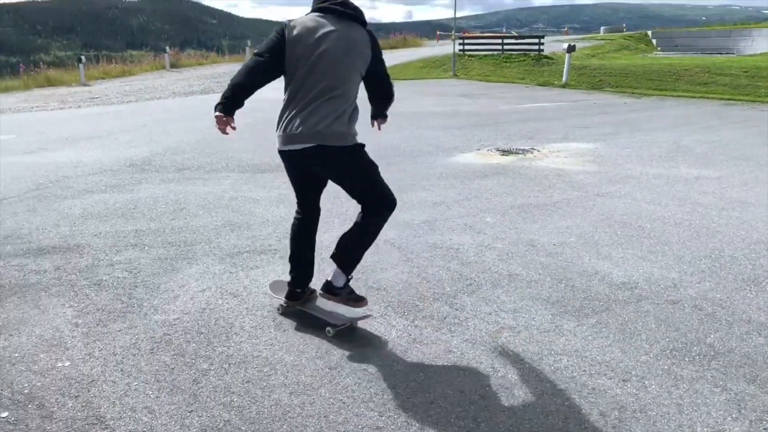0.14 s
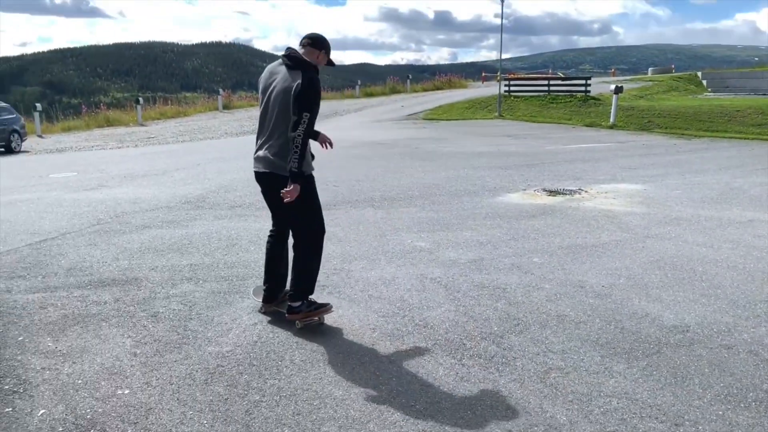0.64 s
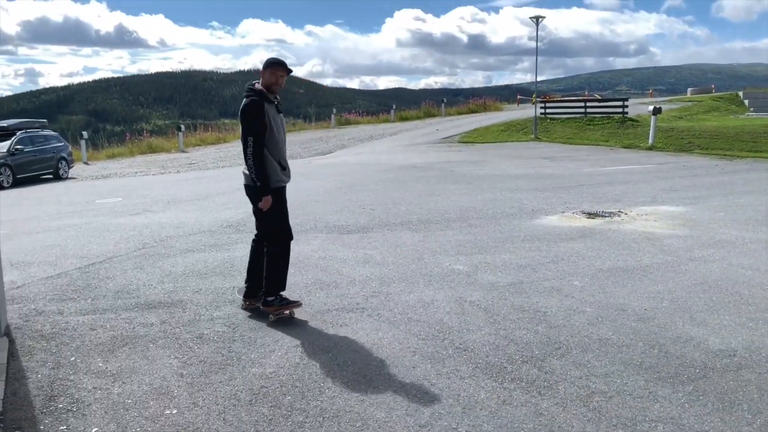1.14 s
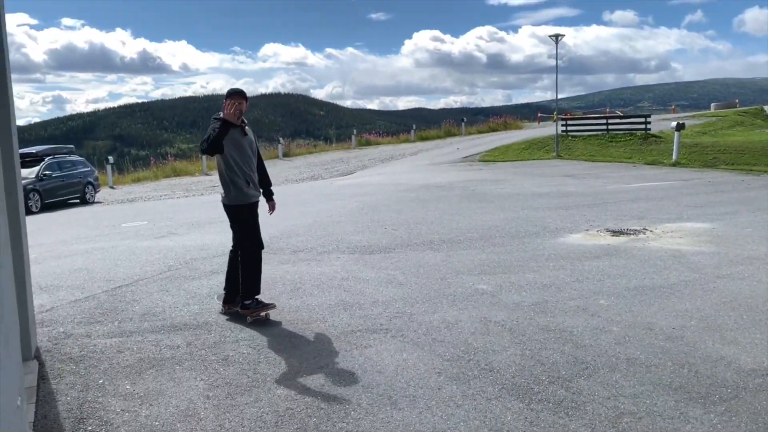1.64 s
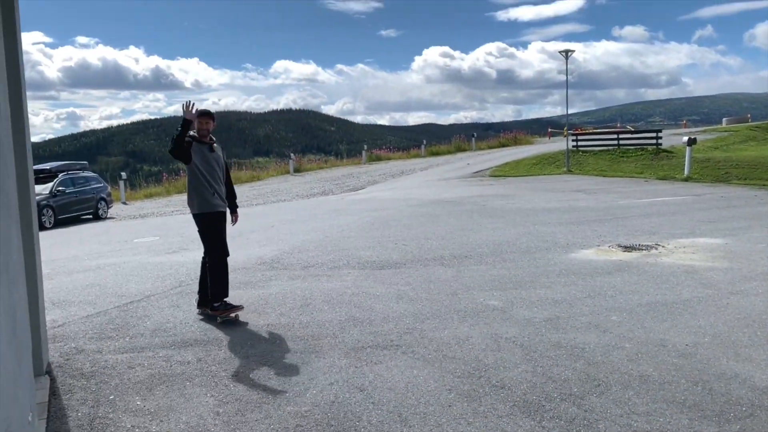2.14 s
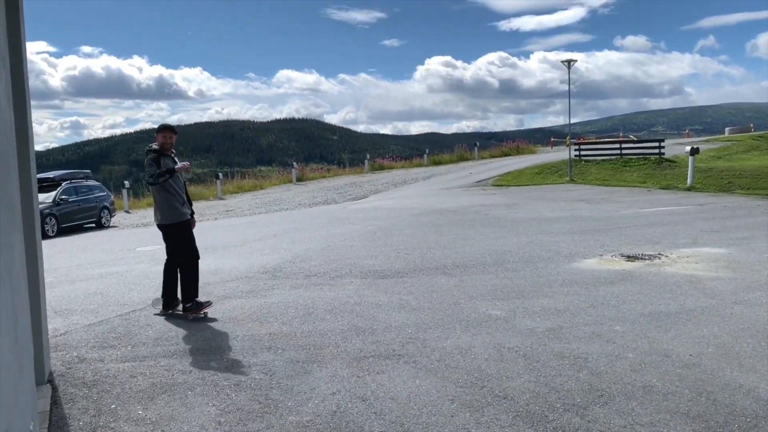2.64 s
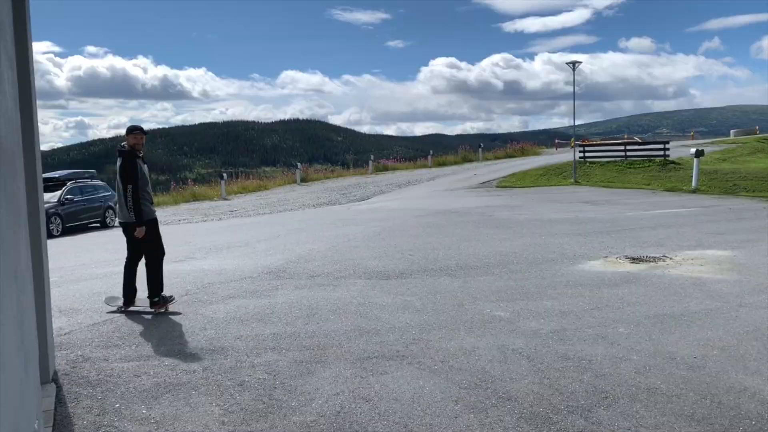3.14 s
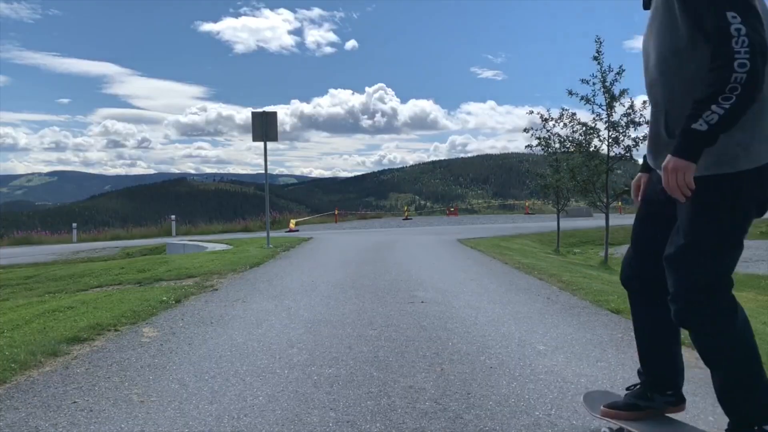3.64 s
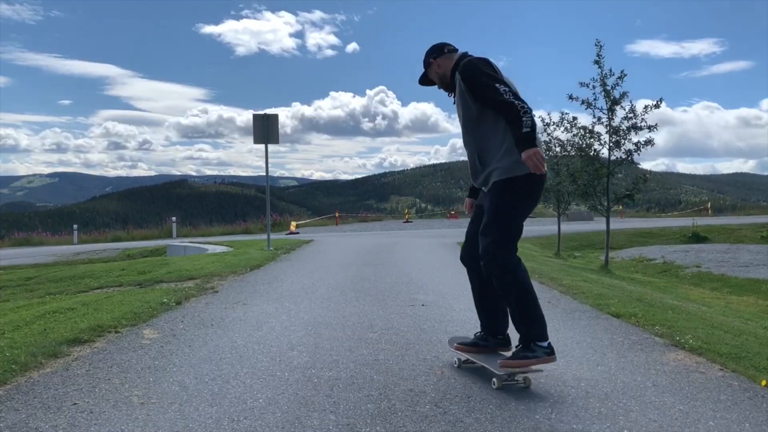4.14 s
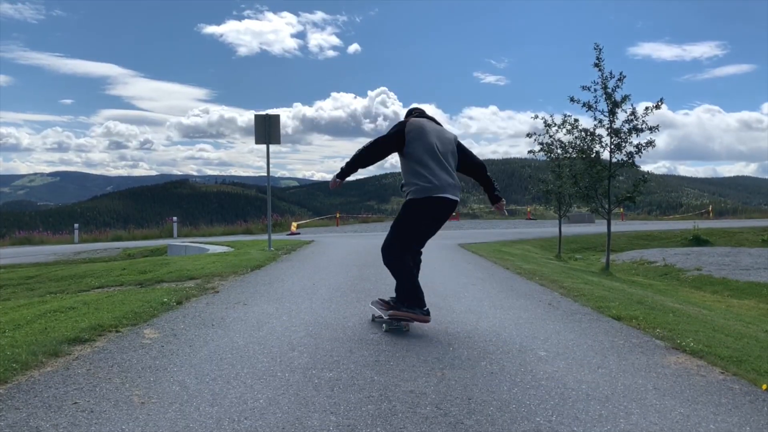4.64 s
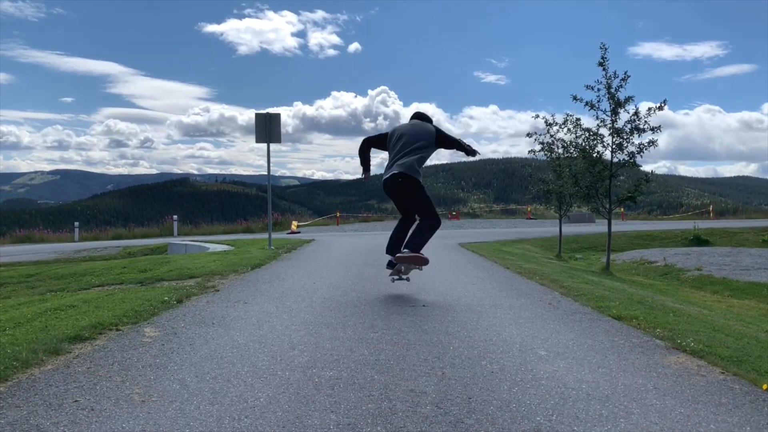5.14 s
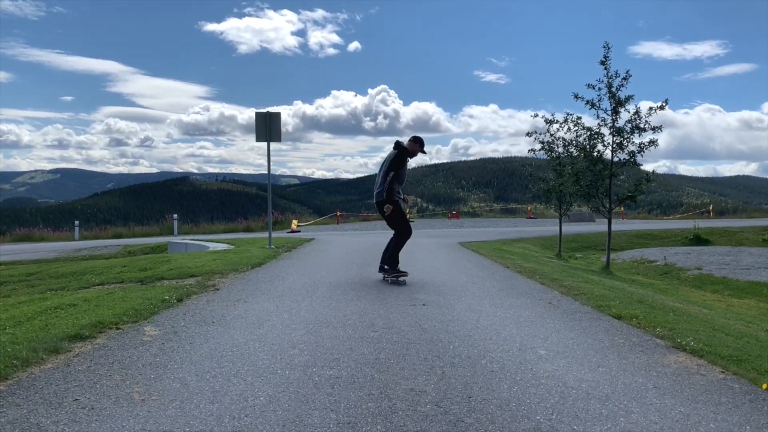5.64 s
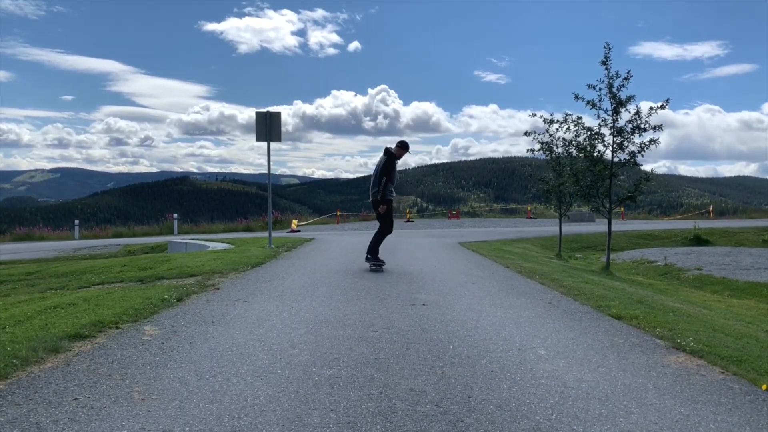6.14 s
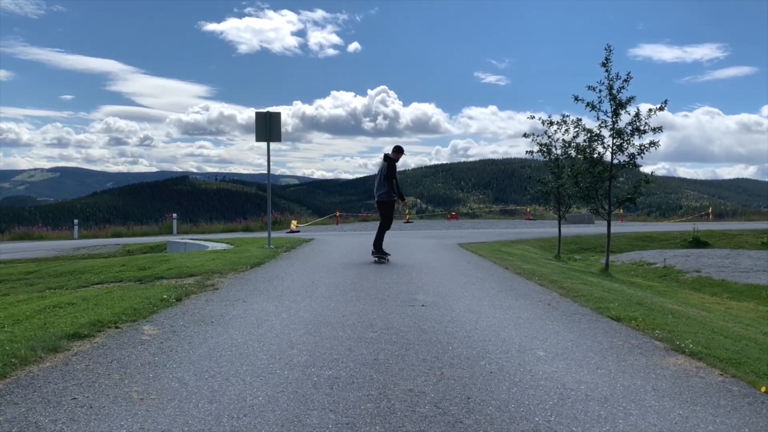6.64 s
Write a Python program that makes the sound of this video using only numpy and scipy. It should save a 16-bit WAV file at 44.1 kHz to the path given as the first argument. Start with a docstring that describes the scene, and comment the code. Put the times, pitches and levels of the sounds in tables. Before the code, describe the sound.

Two close microphones catch a skateboard on rough asphalt. First a clustered landing clack, gritty shoe scuffs and a deck rumble that slowly fades in light wind. Then suddenly a windy road: a sharp knock, brighter truck rattle passing from right to ahead, a crisp pop, a brief lull, a heavy double landing, then receding wheels beneath strong wind buffets.

```python
"""A yard, then a windy road, joined by a hard cut: a skateboard on coarse asphalt, heard by two close microphones.
In the yard it lands a flip close by and rumbles slowly away; on the road it rolls past, pops, lands and rolls off.
Wheels and grit are filtered noise under uneven loads; blows shake resonances of the plywood deck and metal trucks.
Shoes scuff grit, rubber squeaks as short unsteady tones, and wind is low noise with buffets, flutter and puffs."""
import sys
import numpy as np
from scipy import signal
from scipy.fft import rfft, irfft, next_fast_len
from scipy.io import wavfile
from scipy.ndimage import uniform_filter1d, map_coordinates

SR = 44100
rng = np.random.default_rng(int(sys.argv[2]) if len(sys.argv) > 2 else 0)


def master(y):
    """Save y as 16-bit WAV."""
    cut = np.clip(np.atleast_2d(y).T, -1, 1)
    pcm = np.round(cut * 32767)  # scale
    wavfile.write(sys.argv[1], SR, pcm.astype(np.int16))


def elevation(decibels):
    """Turn decibel levels (scalar or array-like) into linear amplitude ratios."""
    levels = np.asarray(decibels, float)
    return 10 ** (levels / 20)


N = 298116
TIME = np.arange(N) / SR
CUT_S = 3.486  # the yard ends and the road begins
# Levels in the tables are relative: each layer sets its own gain when it is mixed.


def unit(x):
    """Scaled to rms 1."""
    return x / np.sqrt(np.mean(x ** 2) + 1e-20)


def along(points, hz):
    """Interpolates (hz, value) points on a log frequency axis."""
    f, v = np.transpose(points)
    return np.interp(np.log(hz + 1), np.log(f + 1), v)


def gains(rows):
    """One gain per sample for each dB column after the time."""
    s, *columns = np.transpose(rows)
    return [elevation(np.interp(TIME, s, c)) for c in columns]


def wobble(rate):
    """A smooth random curve, rate knots a second."""
    knots = rng.standard_normal(int(N * rate / SR) + 4)
    return map_coordinates(knots, [TIME * rate])


def filtered(x, response):
    """x times a complex response of frequency."""
    m = next_fast_len(N + 8192)
    return irfft(rfft(x, m) * response(np.fft.rfftfreq(m, 1 / SR)), m)[..., :N]


def colour(spectrum):
    """Response of a (hz, level_db) spectrum."""
    return lambda hz: elevation(along(spectrum, hz))


def ring(modes):
    """Causal response of (centre_hz, width_hz, level_db) resonances, added with alternating signs."""
    def response(f):
        return sum((-1) ** k * elevation(db) * 1j * f * width / (centre * centre - f * f + 1j * f * width)
                   for k, (centre, width, db) in enumerate(modes))
    return response


def steady(x, span):
    """Evens out the chance swells of a narrow noise over span seconds, so that the load alone sets its level."""
    power = np.abs(uniform_filter1d(x ** 2, int(span * SR), axis=-1))
    return unit(x / np.sqrt(power + 0.11 * np.mean(x ** 2)))


def patches(x, patchy_db):
    """Random gain in patches some hundred hertz wide and some tens of milliseconds long."""
    z = signal.stft(x, nperseg=128)[2]
    field = uniform_filter1d(rng.standard_normal(z.shape[1:]), size=30, axis=1)
    return unit(signal.istft(z * elevation(patchy_db * unit(field)), nperseg=128)[1][:, :N])


def swells(rows):
    """Bell-shaped envelopes from (centre_s, level_db, length_s)."""
    return sum(elevation(db) * np.exp(-((TIME - s) / length) ** 2) for s, db, length in rows)


def bursts(rows, rise, edge):
    """Envelopes (start_s, level_db, length_s): a quick rise, then an end more sudden the larger edge is."""
    env = np.zeros(N + SR)
    t = np.arange(SR // 5) / SR
    for s, db, length in rows:
        fall = np.exp(-(t / max(length, .001)) ** edge)
        env[round(s * SR):][:len(t)] += elevation(db) * (1 - np.exp(-t / rise)) * fall
    return env[:N]


def touches(times, db):
    """One impulse at each time."""
    samples = np.round(np.multiply(times, SR)).astype(int)
    return np.bincount(samples, elevation(db + np.zeros(len(times))), N)


def ring_peak(modes):
    """Largest swing of the modes after one unit impulse."""
    return np.abs(filtered(touches([.01], 0), ring(modes))).max()


def stones(rough_db, rate):
    """Two unrelated noises under one uneven load: wheels bumping over asphalt stones."""
    return rng.standard_normal((2, N)) * elevation(rough_db * wobble(rate))


# how much of the strong wind both ports share: hz, share (0-1)
AIR_SHARE = [(60, 0.67), (130, 0.02), (200, 0.38), (290, 0.6), (400, 0.86), (640, 0.13)]


def eddies(spectrum):
    """Air motion at the two ports: largely shared in the yard's light wind, shared by frequency on the road."""
    air = filtered(rng.standard_normal((3, N)), colour(spectrum))
    share = lambda hz: np.clip(along(AIR_SHARE, hz), 0, 1)
    strong = filtered(air, lambda hz: np.sqrt([share(hz), 1 - share(hz), 1 - share(hz)]))
    calm = 0.89  # share at every frequency
    light = np.sqrt(calm) * air[0] + np.sqrt(1 - calm) * air[1:]
    return np.where(TIME < CUT_S, light, strong[0] + strong[1:])


# strength of the wind on the ports: time_s, level_db
WIND_STRENGTH = [(0, -49), (1, -47.5), (1.7, -46), (2.15, -37.5), (2.45, -41.5), (2.9, -52.5),
                 (3.48, -47.5), (3.49, -27.5), (3.9, -25), (4.15, -24), (4.4, -19.5), (4.7, -22), (5, -22),
                 (5.5, -21), (5.8, -25.5), (6.04, -21), (6.08, -31), (6.12, -21), (6.2, -21.5), (6.55, -22),
                 (6.76, -19)]
# deep soft thumps, of the board and shoes in the yard and of wind buffets on the road: centre_s, level_db, length_s
SOFT_THUMPS = [(.13, -37.5, 0.063), (.34, -38.5, 0.028), (.52, -36, 0.019), (1.39, -55, 0.026),
               (1.8, -57, 0.043), (2.3, -27, 0.048), (2.58, -40.5, 0.054), (2.73, -43, 0.017),
               (3.4, -41, 0.017), (3.495, -20, 0.012), (3.8, -21, 0.0057), (4.2, -28, 0.013),
               (4.34, -17, 0.0089), (4.61, -40, 0.016), (4.72, -18, 0.03), (4.93, -25, 0.037),
               (5.26, -21.5, 0.037), (5.41, -12, 0.0051), (5.7, -18, 0.01), (6.01, -7, 0.019),
               (6.37, -12, 0.0084), (6.48, -12, 0.02), (6.71, -39, 0.0076)]
# short low swells, of wind flutter, and at 5.317 s the low ring of the deck landing: centre_s, level_db, length_s
LOW_SWELLS = [(3.525, -24.5, 0.025), (3.607, -23, 0.011), (3.77, -20, 0.012), (3.94, -26.5, 0.062),
              (4.2, -25, 0.045), (4.34, -22.5, 0.029), (4.555, -25, 0.047), (4.7, -28, 0.048),
              (4.85, -18, 0.013), (4.97, -24, 0.082), (5.317, -1, 0.0046), (5.35, -26, 0.03),
              (5.46, -40, 0.028), (6.03, -24, 0.015), (6.31, -13.5, 0.017), (6.46, -10, 0.01),
              (6.67, -20, 0.0081), (6.73, -17, 0.0067)]
# the strongest sharp puffs: start_s, level_db, left_over_right_db
STRONG_PUFFS = [(3.764, -13.5, 3), (3.835, -21, 3), (3.887, -26, -3), (3.93, -16, 0), (4.182, -20, -2),
                (4.244, -14, 6), (4.315, -12.5, 2), (4.577, -12, 4.5), (4.625, -15, 2), (4.843, -15.5, -4),
                (4.994, -16.5, 9), (5.063, -10.5, 5), (5.118, -13, 5.5), (5.186, -20, 9), (5.25, -10, 5),
                (5.99, -19.5, 1), (6.017, -15.5, 2), (6.156, -14.5, 4.5), (6.238, -14.5, -1.5),
                (6.3, -26, 6), (6.366, -21, 5), (6.451, -12, -2.5), (6.654, -18.5, 5), (6.72, -22.5, 13)]
# spectra of slow buffets, faster flutter, the body of a puff, the edge of a breaking eddy: hz, level_db (per Hz)
BUFFET_SPECTRUM = [(15, -32.5), (35, -10), (62, 9), (100, 1), (160, -7), (300, -33), (1500, -120)]
FLUTTER_SPECTRUM = [(80, -18), (150, 5.5), (280, 1.5), (450, -8), (680, -17), (850, -28), (1300, -39.5),
                    (2500, -66.5), (5000, -120)]
PUFF_SPECTRUM = [(40, 3), (120, -3.5), (300, 0), (600, -11.5), (1100, -28), (1600, -71), (2500, -48),
                 (5000, -120)]
SNAP_SPECTRUM = [(150, -40), (450, -3), (900, 0), (1400, -8), (1900, -30), (3000, -120)]
# sudden front of a strong puff: centre_hz, width_hz, level_db
PUSH_MODE = [(416, 240, 0)]


def sharp_puffs(strength_db):
    """Sharp puffs on each port, listed strong ones and chance small ones, with bright edges and sudden fronts."""
    count = 50  # small puffs, at chance times
    when = rng.uniform(0, TIME[-1], count)
    size, lean = rng.standard_normal((count, 2)).T
    small_db = np.interp(when, TIME, strength_db) + 5 - 3 * size
    small = np.transpose([when, small_db, 2.9 * lean])
    s, db, pan_db = np.vstack([STRONG_PUFFS, small]).T
    length = np.full(len(s), .008)
    sides_db = [db + side * pan_db / 2 for side in (1, -1)]  # left, right
    env = np.array([bursts(zip(s, side_db, length), rise=0.0011, edge=2.2) for side_db in sides_db])
    body = env * steady(eddies(PUFF_SPECTRUM), 0.0125)
    # the strongest eddies break with a brief bright edge
    snaps = env ** 2 / env.max() * steady(eddies(SNAP_SPECTRUM), 0.015)
    strong = len(STRONG_PUFFS)
    fronts = np.array([touches(s[:strong], side_db[:strong]) for side_db in sides_db])
    push = filtered(fronts, ring(PUSH_MODE)) / ring_peak(PUSH_MODE)
    return body + elevation(-10.0) * snaps + elevation(-11) * push


def wind():
    """Eddies press on each port as slow buffets, flutter in lumps and sharp puffs; soft low thumps share the noise."""
    strength_db = np.interp(TIME, *np.transpose(WIND_STRENGTH))
    buffet = elevation(strength_db + 2.43 * wobble(12)) + swells(SOFT_THUMPS)
    # flutter swings wider than the strength
    flutter = elevation(12 + 1.448 * strength_db + 0.37 * wobble(4.5)) + swells(LOW_SWELLS)
    slow = steady(eddies(BUFFET_SPECTRUM), 0.065)
    lumps = elevation(2.2 * wobble(35) + 0.77 * np.array([wobble(60), wobble(60)]))
    fast = unit(lumps * steady(eddies(FLUTTER_SPECTRUM), 0.024))
    return elevation(4.0) * buffet * slow + elevation(-1.0) * flutter * fast + elevation(2.5) * sharp_puffs(strength_db)


# shoe scuffs and grit ticks: start_s, level_db, treble_over_level_db, length_s
SHOE_SCUFFS = [(0.31, -33, -0.5, 0.069), (0.399, -31, -6, 0.0098), (0.469, -34.5, -8, 0.087),
               (2.163, -41.5, 0, 0.17), (2.26, -39, 6, 0.0055), (2.429, -25, 0.5, 0.0045),
               (2.442, -39, -3.5, 0.084), (2.535, -40.5, -2, 0.052), (2.603, -45.5, -2, 0.044),
               (2.795, -42, 4, 0.0044), (2.844, -37, -14, 0.03), (2.877, -35.5, -20, 0.04),
               (2.965, -38.5, -7, 0.017), (3.212, -56.5, 5, 0.01), (3.467, -37, -28, 0.006),
               (4.138, -36, 5, 0.011), (4.163, -29.5, -3, 0.02), (5.456, -30.5, -21, 0.019)]
# ring of one small bright tick: centre_hz, width_hz, level_db
TICK_MODE = [(4900, 170, 0)]
# spectra of the hiss and of the finer grit, also used for wheels and blows: hz, level_db (per Hz)
HISS_SPECTRUM = [(300, -49), (500, -10.5), (1000, 8.5), (2000, 8.5), (4000, 2), (6500, -2.5), (8000, -38.5),
                 (12000, -85)]
GRIT_SPECTRUM = [(1500, -79.5), (3500, 6.5), (5000, -9.5), (6500, 2.5), (8500, 5.5), (10500, 6), (13000, 7),
                 (15500, 7), (17000, -11.5)]
# modes of the plywood deck (low) and the metal trucks (high), for every board sound: centre_hz, width_hz, level_db
DECK_MODES = [(200, 140, 0), (304, 98, 3), (494, 270, -8), (702, 147, 2), (1052, 167, 3)]
TRUCK_MODES = [(1370, 160, -10.5), (1618, 150, 7), (2316, 130, -21), (3040, 130, -4), (3300, 240, -4),
               (3730, 180, -6)]


def scuffs():
    """Soles drag grit across the grip tape and the ground in squeaky streaks, shaking deck and trucks a little."""
    s, db, treble_db, length = np.transpose(SHOE_SCUFFS)
    drag = patches(stones(rough_db=3.0, rate=250), patchy_db=2.5)

    def scrape_response(hz):
        trucks = elevation(-15.0) * ring(TRUCK_MODES[2:])(hz)
        deck = elevation(15.0) * ring(DECK_MODES[3:])(hz)
        return elevation(along(HISS_SPECTRUM, hz)) + trucks + deck

    scrape = unit(filtered(drag, scrape_response))
    dust = unit(filtered(drag, colour(GRIT_SPECTRUM)))
    scrape = scrape * bursts(zip(s, db, length), rise=0.0087, edge=2.4)
    dust = dust * bursts(zip(s, db + treble_db, length), rise=0.0016, edge=3.0)
    tick = filtered(touches([1.097], 0), ring(TICK_MODE))
    return elevation(-28) * tick / tick.max() + scrape + dust


# short squeaks of rubber: centre_s, level_db, pitch_hz (mean), length_s
RUBBER_SQUEAKS = [(.33, -30, 4800, .014), (0.344, -36.5, 2820, 0.018), (0.341, -33, 5150, 0.014),
                  (0.37, -41, 2050, 0.026), (0.377, -33, 4830, .006), (0.481, -33, 3970, 0.011),
                  (0.493, -40, 3850, 0.012), (0.494, -42, 2420, 0.015), (0.53, -43, 2490, .012),
                  (3.543, -36, 5730, 0.013), (3.558, -33, 1880, .014), (3.687, -27.5, 6400, 0.0058)]


def squeaks():
    """Rubber sticks and slips for a moment: an unsteady tone under a bell-shaped swell."""
    waver = 1 + .05 * wobble(300)  # factor on the pitch
    rough = elevation(5.9 * wobble(400))
    warped_s = np.cumsum(waver) / SR
    tone = sum(swells([(s, db, length)]) * np.sin(2 * np.pi * hz * warped_s)
               for s, db, hz, length in RUBBER_SQUEAKS)
    return rough * tone * [[1], [.3]]


def pebbles():
    """Wheels hit coarse stones: chance knocks, most small and some larger, ring the trucks."""
    count, spread_db = 2500, 12.5  # spread: largest over smallest
    when, size = rng.uniform(0, 1, (count, 2)).T
    signs = np.sign(rng.standard_normal((2, N)))
    knocks = touches(when * TIME[-1], spread_db * size ** 3) * signs
    response = lambda hz: ring(TRUCK_MODES)(hz) + elevation(-11.0) * ring(TRUCK_MODES[2:3])(hz)
    return unit(filtered(knocks, response))


# yard, rolling away: time_s, wheels_level_db, grit_level_db
YARD_LEVELS = [(0.0, -56, -45), (0.1, -49, -39), (0.24, -34, -40), (0.4, -38.5, -46.5), (0.6, -36, -48),
               (0.81, -36, -47.5), (1.39, -36, -50), (1.95, -37, -51), (2.55, -40.5, -53), (2.99, -45, -56),
               (3.26, -49, -61), (3.46, -53.5, -62)]
# road, passing and rolling off: time_s, trucks_level_db, grit_level_db
ROAD_LEVELS = [(3.49, -38, -35.5), (3.57, -35, -36.5), (3.63, -39.5, -38), (3.7, -34, -39.5),
               (3.74, -34.5, -45), (3.82, -40.5, -48), (3.95, -43, -49), (4.2, -36.5, -43.5),
               (4.5, -40, -45), (4.7, -34.5, -43), (4.76, -34.5, -42.5), (4.81, -43, -49),
               (4.835, -29.5, -40), (4.89, -35.5, -47), (5.34, -40.5, -51), (5.6, -40.5, -54),
               (6.2, -45, -58.5), (6.76, -46.5, -61)]
# drumming of the wheels on the deck: hz, level_db (per Hz)
RUMBLE_SPECTRUM = [(50, -38), (100, -1.5), (190, -0.5), (330, -1.5), (480, -11), (800, -18), (1600, -77),
                   (3500, -120)]


def rolling():
    """Slow wheels drum the deck in the yard; fast wheels ring the trucks on the road; grit crackles under both."""
    rumble, hiss = gains(YARD_LEVELS)
    # the deck's ring fades with distance and returns on rougher ground
    deck = rumble * (elevation(-0.5 - 14 * TIME) + elevation(-4.5) * np.clip(TIME - 1.88, 0, 1))
    yard_grit = elevation(-8.5) * hiss
    flying = (TIME > 4.9) & (TIME < 5.28)  # s; in the air the wheels only spin
    trucks, road_grit = gains(ROAD_LEVELS) * elevation(np.outer([-8.5, -6], flying))

    grit = unit(filtered(stones(rough_db=2.5, rate=280), colour(GRIT_SPECTRUM))) * elevation(7.0 + 0.31 * wobble(34))
    # the finest dust is strongest at the start of each scene, while the board is near
    dust = elevation(-13) + elevation(-4) * np.exp(-(TIME % CUT_S / 1.22) ** 4)
    grit = grit + dust * unit(filtered(grit, lambda hz: hz > 13500)) * np.abs(grit).mean()

    drum = steady(filtered(stones(rough_db=0.5, rate=39), colour(RUMBLE_SPECTRUM)), 0.11)
    drum = drum * elevation(1.48 * wobble(29.53))
    wood_response = lambda hz: ring(DECK_MODES[3:])(hz) * elevation(along(HISS_SPECTRUM, 3.2 * hz))
    wood = unit(filtered(stones(rough_db=3.5, rate=49), wood_response))
    fizz = patches(filtered(stones(rough_db=1.5, rate=310), colour(HISS_SPECTRUM)), patchy_db=3.5)

    def metal_response(hz):
        deck_part = elevation(-18.0) * ring(DECK_MODES[4:])(hz)
        return ring(TRUCK_MODES)(hz) + deck_part + elevation(-13.5 + along(HISS_SPECTRUM, hz))

    metal = unit(filtered(stones(rough_db=0.5, rate=70), metal_response))
    yard = rumble * elevation(2.5) * drum + deck * wood + hiss * fizz + yard_grit * grit

    near = np.exp(-np.abs(TIME - CUT_S) / 0.25)  # close by, deck and grit are heard as well as the trucks
    rattle = elevation(-2.5 + 2.03 * wobble(30)) * metal
    rattle = rattle + elevation(-5.5 + 3.3 * near) * pebbles()
    rattle = rattle + elevation(-5.0 + 13.6 * near) * wood + 2.27 * near * fizz
    return np.where(TIME < CUT_S, yard, trucks * rattle + road_grit * grit)


# blows on the board: start_s, lower_trucks_level_db; relative to that wood_db, highest_deck_mode_db, #
# middle_truck_mode_db, upper_trucks_db, treble_db; then contact_s (some layers stretch or shorten it a little)
BOARD_BLOWS = [(0.027, -49.5, 17, -3.5, 8, -0.5, 11, 0.019), (0.0906, -25.5, 16.5, 18, 1.5, -4, 11, 0.0073),
               (0.097, -27, 19, 0.5, -2.5, 5.5, 13, 0.0089), (0.1101, -25, 3, 5, 8, -0.5, 8.5, 0.0047),
               (0.1129, -16.5, 4.5, -1, 6, 1, 4, 0.0042), (0.1172, -17, 8, -7, 13, 5, 0.5, 0.005),
               (0.124, -29, 9, 4.5, -3, 0.5, 5.5, 0.031), (0.1435, -21.5, 10.5, 16, 1.5, -3, 9, 0.0032),
               (0.149, -28, 21.5, 1, -1.5, -4.5, 4, 0.0057), (0.16, -36, 11, 3, -5.5, -12, -7.5, 0.013),
               (0.183, -32.5, 8, 8, -2, -5, -5, 0.0063), (0.188, -32, 12, -0.5, 2, 3.5, -1, 0.0094),
               (2.123, -45.5, 7, -2, -8, -5, 2, 0.003), (2.445, -46.5, 14, 9, -6, 0, 2, 0.0036),
               (2.892, -44.5, 7, 9, -6, -6, -2.5, 0.0039), (3.658, -28.5, -9, -9.5, -6, -4, 6, 0.0019),
               (3.669, -14.5, -4, -10, -8.5, -17, -1.5, 0.0028),
               (4.756, -25.5, -16, -2, -20, -9, -10, 0.01), (4.886, -17.5, 2.5, 5, 2, -7, -20.5, 0.0033),
               (4.891, -13.5, -10, -2.5, 2.5, -7, -11.5, 0.005),
               (4.897, -19.5, -19, 0, -7.5, -10, -16, 0.0053), (4.907, -30.5, -4, 1, -6, -16, -6, 0.0091),
               (5.2791, -9, -11, 2.5, -8, -5, -8, 0.0058), (5.284, -7.5, -18, -6, -10, -11, -8, 0.0044),
               (5.292, -25, -12, -5, -5, -3, -1, 0.013), (5.308, -7, -1, -1.5, -4, -11, -0.5, 0.0054),
               (5.316, -25, 3, 2, -5, -4, -14, 0.0089), (5.384, -21, -1, 3, -13, -4.5, -3.5, 0.0078),
               (5.391, -24, 2, 4.5, -7.5, -14, -5, 0.0054), (5.424, -41, 12, 2, 4, 6, 13, 0.0068),
               (5.615, -42, 22.5, 21, 8.5, 2, -14, 0.0056), (5.771, -28, -2, 2.5, -28, -8.5, -1.5, 0.0077)]


def blows():
    """Each blow shakes deck and trucks for about the length of the contact and cracks in the treble."""
    s, db, wood_db, tip_db, middle_db, upper_db, treble_db, contact = np.transpose(BOARD_BLOWS)
    chatter = stones(rough_db=4.5, rate=350)

    def strike(level, length, edge, response):
        env = bursts(zip(s, level, length), rise=.0005, edge=edge)
        return env * steady(filtered(chatter, response), 0.01)

    def knock(level, modes):
        return filtered(touches(s, level), ring(modes)) / ring_peak(modes)

    wood = strike(db + wood_db, 1.32 * contact, 1.56, ring(DECK_MODES[:4]))
    tip = strike(db + tip_db, 1.02 * contact, 1.15, ring(DECK_MODES[4:]))
    lower = strike(db, contact, 2.7, ring(TRUCK_MODES[:2]))
    middle = strike(db + middle_db, contact, 2.3, ring(TRUCK_MODES[2:3]))
    upper = strike(db + upper_db, 1.24 * contact, 2.5, ring(TRUCK_MODES[3:]))
    crack = strike(db + treble_db, 0.91 * contact, 1.9, colour(GRIT_SPECTRUM))
    # first touch: a short bright crack
    crack = crack + strike(db + treble_db - 3.5, np.full(len(s), 0.0012), 1.0, colour(GRIT_SPECTRUM))
    clatter_response = lambda hz: elevation(along(HISS_SPECTRUM, hz / 1.5))
    clatter = elevation(-5.0) * strike(db + (middle_db + treble_db) / 2, 1.16 * contact, 1.0, clatter_response)

    # first touch: the modes ring freely
    free = knock(db + wood_db, DECK_MODES[1:4]) + knock(db + tip_db, DECK_MODES[4:])
    free = free + knock(db, TRUCK_MODES[:2]) + knock(db + middle_db, TRUCK_MODES[2:3])
    free = free + elevation(-7.5) * knock(db + upper_db, TRUCK_MODES[3:])
    board = wood + tip + lower + middle + upper + clatter + crack + elevation(-2) * free * [[1], [.3]]

    # nearby walls and the ground return a short blurred tail, 60 dB down after 0.068 s
    tail = rng.standard_normal((2, SR // 4)) * elevation(-60 * TIME[:SR // 4] / 0.068)
    tail = tail / np.linalg.norm(tail[0])
    return board + elevation(-9.5) * signal.fftconvolve(board, tail, axes=1)[:, :N]


# level tilt of the microphone pair: hz, left_over_right_db
PAIR_LEAN = [(300, 1.5), (1200, 2.5), (2500, -0.5), (5000, -3), (7500, 1.5)]
# likeness of the two microphones: hz, likeness (0-1)
PAIR_LIKENESS = [(200, .97), (1000, .85), (2500, .75), (4500, .45), (6800, .75), (7800, .995),
                 (16000, .995)]


def ports(pair, lead, blur):
    """Two close microphones: partly alike, tilted in level and shifted in phase; spread sources blur more."""
    slope = lambda hz: np.interp(hz, *np.transpose(lead))
    # phase pulled toward in phase or opposed, with likeness reduced in between
    phase = lambda hz: slope(hz) - .45 * np.sin(2 * slope(hz))

    def turn(hz):
        likeness = along(PAIR_LIKENESS, hz) ** blur * (1 - 0.59 * np.sin(phase(hz)) ** 2)
        return np.arccos(np.clip(likeness, 0, 1)) / 2

    def left_right(hz):
        half = elevation(along(PAIR_LEAN, hz) / 2)
        return np.array([half, np.exp(1j * phase(hz)) / half])

    same, other = filtered(pair, lambda hz: np.array([np.cos(turn(hz)), np.sin(turn(hz))]))
    return filtered(np.array([same + other, same - other]), left_right)


# phase between the microphones, for the board in the yard, ahead on the road, and close on the right:
# hz, right_leads_rad (before the pull in ports)
YARD_LEAD = [(0, 0), (2000, -2.8), (4000, -4), (6300, -6), (8500, -3.14), (16000, 6.28)]
ROAD_LEAD = [(0, 0), (1200, .7), (3500, -1.1), (4600, -2.8), (6100, 0), (8500, 3.14), (16000, 12.57)]
RIGHT_LEAD = [(0, 0), (500, 1.1), (2000, 1.6), (4000, 3), (4700, 5.2), (6100, 6.28), (8500, 9.42),
              (16000, 18.85)]


def scene():
    """The yard, then the road, where the board enters from the right and goes ahead; wind acts on the ports directly."""
    wheels = rolling() + scuffs()
    ahead = np.clip((TIME - 3.7) / 0.27, 0, 1)
    road = ahead * ports(wheels, ROAD_LEAD, blur=1.0) + (1 - ahead) * ports(wheels, RIGHT_LEAD, blur=1.0)
    board = np.where(TIME < CUT_S, ports(wheels, YARD_LEAD, blur=3.3), road)
    return board + ports(blows() + squeaks(), ROAD_LEAD, blur=1.0) + wind()


def roll_off(x):
    """The treble ends steeply here."""
    return signal.sosfilt(signal.butter(12, 16250, fs=SR, output="sos"), x)


def record(dry):
    """The microphones clip the loudest peaks softly and lose deep bass and all above the band limit."""
    clipped = dry / (1 + np.abs(dry / 1.04) ** 6) ** (1 / 6)
    bass_hz, top_hz, steepness = 30, 15900, 150  # both edges at half amplitude
    band = lambda hz: (1 - 1 / (1 + (hz / bass_hz) ** 4)) / (1 + (hz / top_hz) ** steepness)
    return roll_off(filtered(clipped, band))


dry = scene()
out = record(dry)
master(out)
```